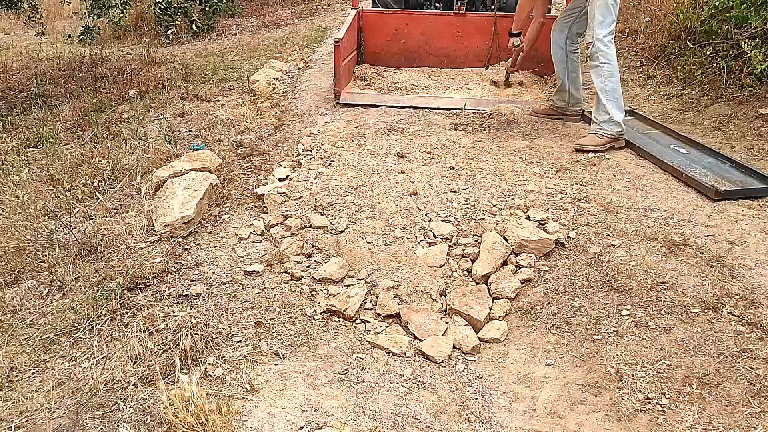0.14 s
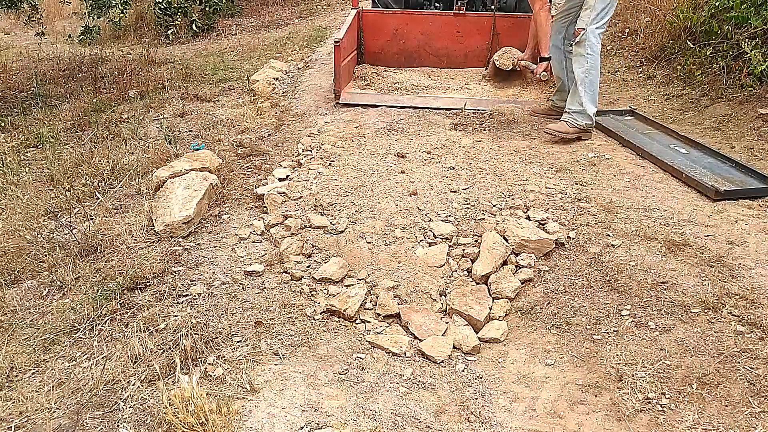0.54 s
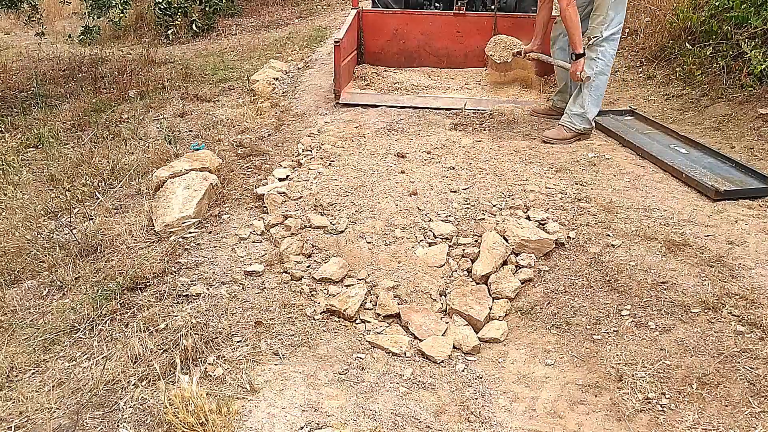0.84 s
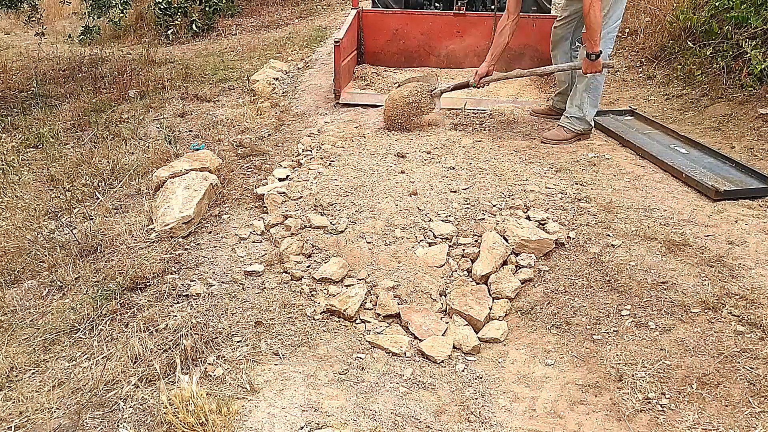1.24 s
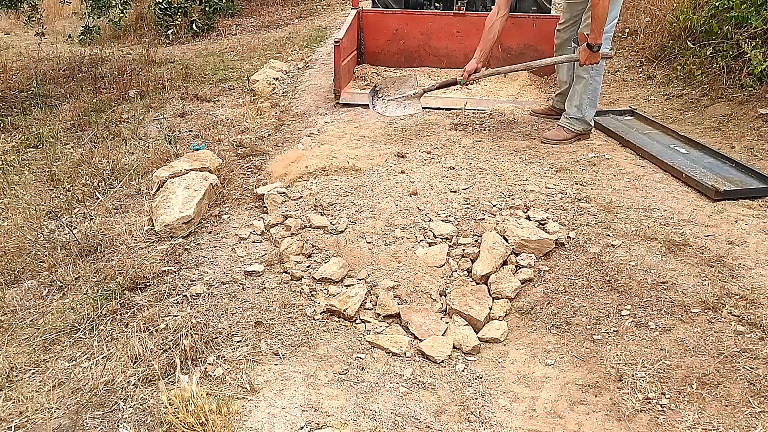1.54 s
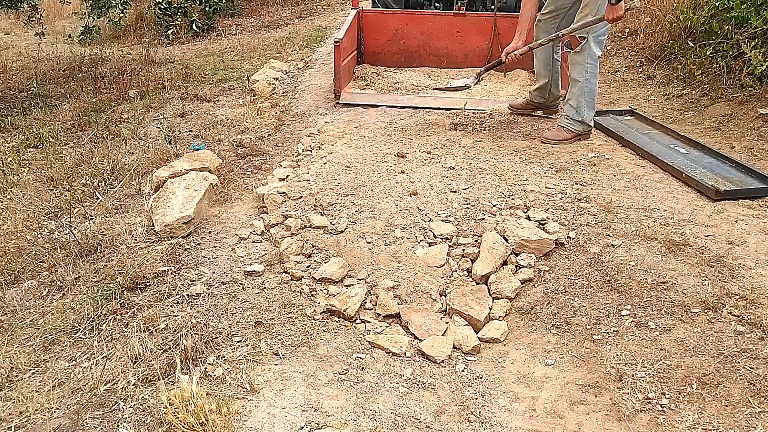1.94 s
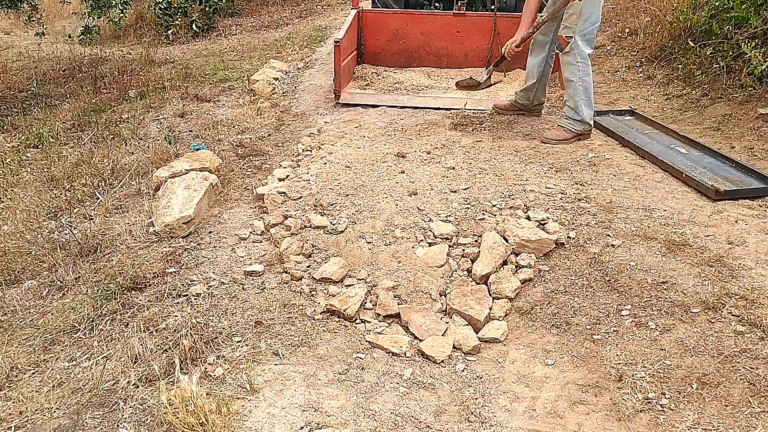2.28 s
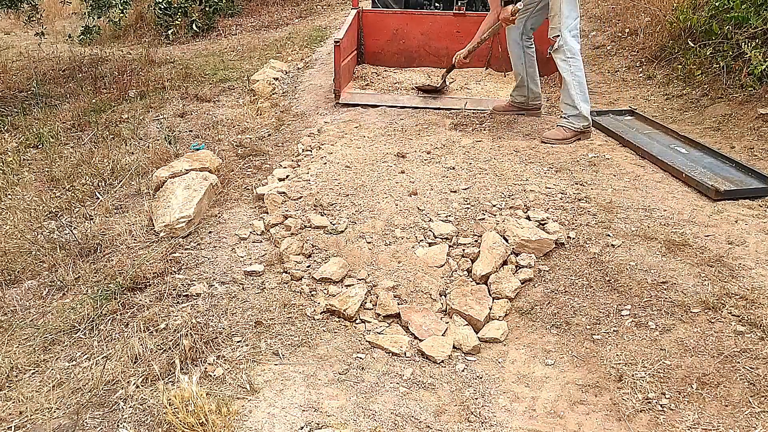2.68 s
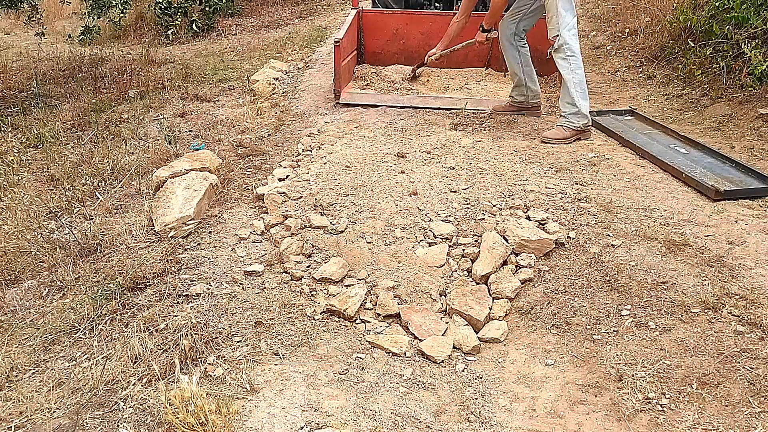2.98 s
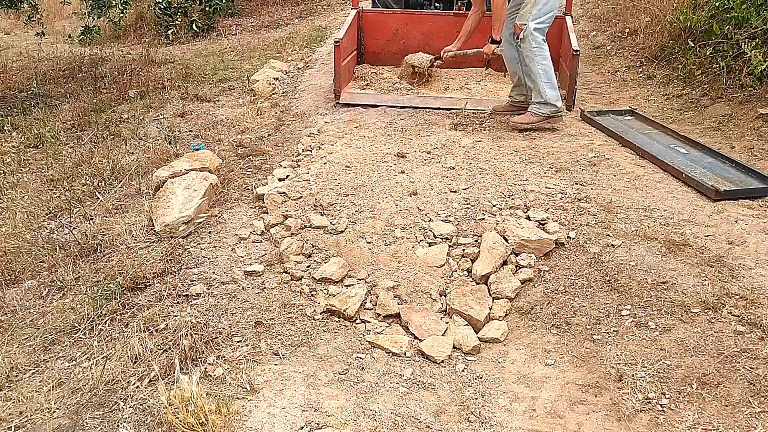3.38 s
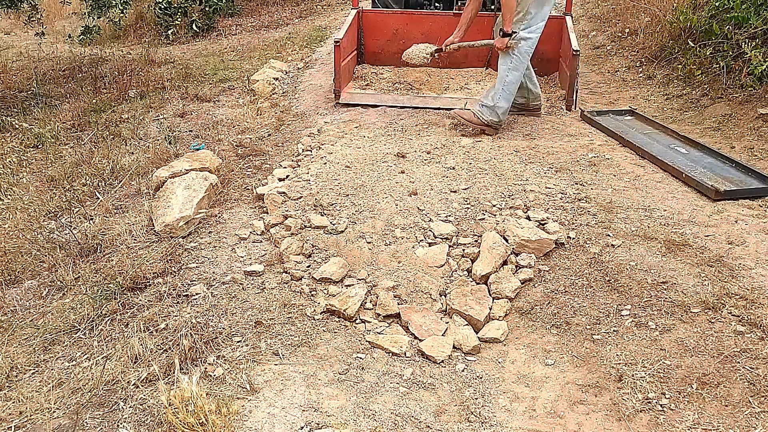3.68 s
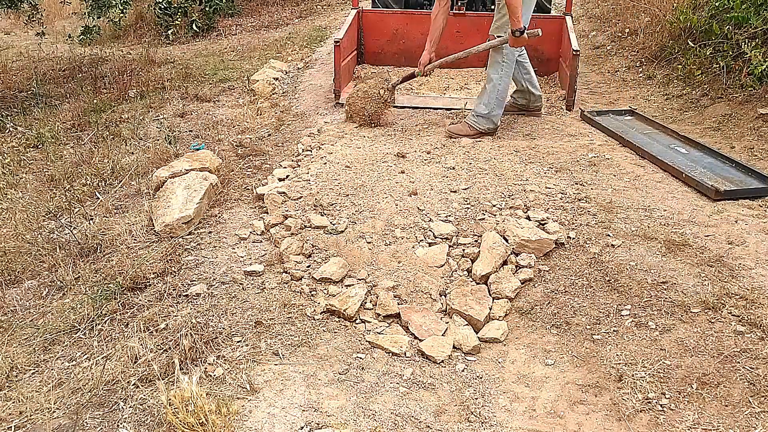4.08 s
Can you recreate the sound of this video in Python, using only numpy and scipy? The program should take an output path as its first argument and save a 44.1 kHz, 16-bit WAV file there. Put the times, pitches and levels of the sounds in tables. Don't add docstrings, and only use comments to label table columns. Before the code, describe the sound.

A shovel bites harshly into sand and gravel in a steel trailer box, tosses the load, then strikes the floor and scoops again outdoors.

```python
import sys
import numpy as np
from scipy import signal
from scipy.fft import rfft, irfft, next_fast_len
from scipy.io import wavfile

SR = 44100
rng = np.random.default_rng(int(sys.argv[2]) if len(sys.argv) > 2 else 0)


def amplitude_ratio(level_db):
    exponent = np.asarray(level_db, float) / 20
    return 10 ** exponent


def transcribe(signal):
    frames = np.atleast_2d(signal).T
    limited = np.clip(frames, -1, 1)
    pcm = np.round(limited * 32767).astype(np.int16)
    wavfile.write(sys.argv[1], SR, pcm)


N = 186084
SIZE = next_fast_len(N + 8192)
HZ = np.maximum(np.arange(SIZE // 2 + 1) * SR / SIZE, 1)

# (time [s], grit hiss [dB], blade scrape [dB], box rumble [dB])
SCOOP_1 = [
    [(0.0, -28.5, -26, -43), (0.024, -22.5, -32.5, -30), (0.034, -17.5, -18.5, -44),
     (0.05, -30, -32.5, -39.5)],
    [(0.052, -27.5, -28, -34), (0.062, -20.5, -22, -45.5), (0.112, -41, -39.5, -37.5),
     (0.125, -41.5, -53, -49.5)],
    [(0.127, -46, -48.5, -45.5), (0.141, -43.5, -34.5, -40), (0.189, -48, -56.5, -57),
     (0.211, -54, -42.5, -49.5), (0.223, -54, -62.5, -55.5), (0.3, -72, -72, -70.5)],
]
THROW = [(0.31, -81, -79, -82), (0.55, -69.5, -75, -66), (0.67, -68, -79.5, -76.5), (0.83, -63.5, -76, -72),
         (0.94, -65, -73, -72.5), (1.1, -61, -76.5, -72), (1.22, -52.5, -59, -67),
         (1.27, -51, -54.5, -60.5), (1.42, -53, -67.5, -69.5), (1.63, -53, -64.5, -68),
         (1.71, -55, -70, -69.5), (1.85, -59.5, -76.5, -72), (2.14, -78.5, -106, -73.5),
         (2.33, -100.5, -101, -70), (2.42, -96.5, -99.5, -82)]
SCOOP_2 = [
    [(2.433, -44, -37.5, -32), (2.473, -42, -45, -44), (2.499, -49.5, -45.5, -46),
     (2.524, -33, -40.5, -52.5)],
    [(2.527, -25, -33.5, -48), (2.571, -23, -23.5, -34.5), (2.605, -26, -34.5, -37),
     (2.613, -25, -26, -30.5), (2.69, -29, -30, -33)],
    [(2.692, -26, -25, -32), (2.72, -19, -27.5, -32), (2.758, -24.5, -32.5, -35.5), (2.846, -33, -37, -36),
     (2.886, -29, -38.5, -24.5), (2.91, -35.5, -41, -38)],
    [(2.912, -40.5, -45, -33), (2.942, -48, -56.5, -42.5), (2.972, -45.5, -60, -46.5),
     (2.984, -42.5, -43, -42), (3.026, -58, -67, -52.5), (3.12, -62.5, -70.5, -66.5)],
]
LIFT = [
    (3.13, -73, -83, -71),
    (3.412, -65, -69.5, -76),
    (3.606, -68.5, -76.5, -70.5),
    (3.686, -66.5, -74, -61.5),
    (3.82, -58, -68.5, -72),
    (3.97, -56.5, -73.5, -70.5),
]
SLIDE = [
    (3.98, -55, -67, -63),
    (4.02, -56.5, -61, -68.5),
    (4.158, -45, -52, -60.5),
    (4.214, -53.5, -59.5, -76.5),
    (4.22, -49.5, -58.5, -72),
]
# (time [s], peak [dB], blade share [dB], box share [dB], t60 [s])
CLODS = [(0.2035, -41.5, -5.5, -0.5, 0.07), (0.7515, -51, -24, -12.5, 0.11), (0.815, -48, -24, -25, 0.087),
         (0.8379, -48.5, -6, -13, 0.088), (0.9926, -45.5, -16, -11.5, 0.076), (1.05, -37, -18, -37, 0.062),
         (1.086, -41.5, -19, -26, 0.097), (1.0942, -45.5, -20, -14.5, 0.1), (1.1022, -36.5, -18, -13, 0.07),
         (1.1232, -23.5, -19, -29, 0.083), (1.1542, -36.5, -31, -15.5, 0.11), (1.7738, -42, -13, -26, 0.05),
         (1.8646, -45.5, -8, -35.5, 0.065), (2.2398, -61.5, -26, 2.5, 0.07), (2.3624, -69, -18, 9.5, 0.099),
         (2.4319, -31.5, -2, 4.5, 0.068), (2.5299, -20, -4, -13, 0.07), (2.6374, -17, -16.5, -14, 0.092),
         (3.2655, -50.5, -12, -23.5, 0.055), (3.3528, -46.5, -15.5, -7.5, 0.058),
         (3.599, -45, -9, -10, 0.14), (3.6242, -43.5, -7, -1, 0.083), (3.688, -24.5, -13.5, -20, 0.033),
         (3.6944, -36, -29.5, -16.5, 0.062), (3.7133, -31.5, -38, -51, 0.07),
         (3.7468, -36, -15.5, -31, 0.093), (3.7693, -32, -17, -21, 0.07),
         (3.7866, -34.5, -18.5, -16, 0.089), (3.8573, -26, -17, -26, 0.037),
         (3.9027, -38.5, -24.5, -24, 0.049), (3.9385, -35.5, -24, -18, 0.097)]
# (time [s], peak [dB], blade share [dB], box share [dB], t60 [s])
SURGES = [(0.0599, -6, -17, -17, 0.075), (0.1404, -27, -8, -12.5, 0.05), (0.7876, -46, -21, -25, 0.05),
          (1.3154, -37.5, -24, -23, 0.05), (1.5738, -36.5, -23, -15, 0.05),
          (2.5534, -18.5, -12, -17, 0.037), (2.5764, -16.5, -7, -7.5, 0.043),
          (2.6139, -12.5, -18, -11.5, 0.044), (2.7002, -11.5, -15.5, -20.5, 0.046),
          (2.7214, -12, -25, -19, 0.057), (2.8734, -19.5, -3.5, -5.5, 0.041),
          (2.8825, -8, -16.5, -16, 0.05)]
# (time [s], share [0-1])
EMPTYING = [
    (1.15, 0),
    (1.24, .9),
    (1.4, 0),
    (3.98, 0),
    (4.1, .9),
    (4.22, .9),
]
# (frequency [Hz], density [dB per Hz])
GRIT_SPECTRUM = [(3000, -42.5), (4800, -27), (5500, -15.5), (7000, -9), (8000, -1), (9000, 3), (10700, 1.5),
                 (11600, -9), (12200, -24), (16200, -35.5)]
# (frequency [Hz], density [dB per Hz])
TOP_BAND_SPECTRUM = [(11000, -30.5), (12200, 0), (15300, -2), (16200, -20.5)]
TOP_BAND_DB, TOP_BAND_GROWTH = -30.5, 0.71
# (frequency [Hz], width [Hz], level [dB])
BLADE_MODES = [(1750, 17, 1), (2510, 16, 3), (2920, 46, -4.5), (4180, 68, -10.5), (4900, 37, -12.5),
               (5140, 68, -11), (5120, 220, -15)]
# (frequency [Hz], width [Hz], level [dB])
BLADE_EDGE_MODE = (7880, 1500, -4.5)
# (frequency [Hz], width [Hz], level [dB])
FREE_BLADE_MODES = [(1750, 60, -3), (2160, 98, -5), (2450, 120, 2.5), (2830, 110, -3), (3560, 120, -6),
                    (5100, 150, -7)]
# (frequency [Hz], width [Hz], level [dB])
BOX_MODES = [(215, 120, 2), (449, 26, -2), (757.4, 49, -3.5), (969, 330, 7.5), (1490, 35, -7.5)]
# (frequency [Hz], density [dB per Hz])
AIR_SPECTRUM = [(59, -29.5), (100, 2), (471, -8), (784, -22.5), (1030, -26), (1480, -22.5), (1580, -26.5),
                (10500, -16.5), (16000, -28)]
AIR_DB = -73.5
# (time [s], level [dB], left minus right [dB])
WIND = [(0.0, -73, -2), (0.09, -55, 0.5), (0.23, -53, 13), (0.37, -59.5, 14), (0.45, -56, 38.5),
        (0.5, -53, 51.5), (0.6, -56, 19.0), (0.68, -50, 24.5), (0.82, -50.5, 1.5), (0.94, -58.5, 10),
        (1.08, -61, -1.5), (1.16, -66, 4), (1.61, -60.5, 15), (1.66, -73.5, 10.5), (2.07, -71, -2),
        (2.28, -75.5, 6.5), (2.67, -61.5, 2.5), (3.01, -70, 7), (3.1, -60, -7), (3.19, -72, 0.5),
        (3.38, -66, 5), (3.47, -66, -6), (3.55, -65.5, 8.5), (3.66, -61, 4), (3.78, -57.5, 14.5),
        (3.92, -66, -16.5), (3.97, -57.5, -2), (4.05, -58, 26.0), (4.22, -58, -5.5)]
# (time [s], peak [dB], ring [Hz], left minus right [dB], flutter share [dB])
SLAPS = [(0.12, -55.5, 26.9, 4, 11), (0.22, -40, 34.4, 21, -12), (0.418, -49, 26.4, 18.5, -13.5),
         (0.468, -37, 30.4, 40, -10.5), (0.509, -42, 100.5, 31.5, -14), (0.528, -43, 42.9, 34.5, -14),
         (0.569, -40, 27.4, 29, -12), (0.584, -44.5, 26.4, 23, -1.5), (0.657, -35.5, 73.4, 30, -7.5),
         (0.698, -49, 43.1, 21.5, -25.5), (0.76, -51, 71.5, 11, -10), (0.808, -63, 32.3, 3.5, -7.5),
         (0.849, -42, 27.6, 7.0, -28), (0.907, -43.5, 29.7, 15, -24), (1.018, -54, 39.4, 6.0, -16),
         (1.158, -49, 27.6, 16, -20), (1.437, -52, 47, 16.5, -15.5), (1.6, -54.5, 26.6, 9, -16),
         (1.999, -60, 26.9, -1.0, -21), (2.149, -62, 26.9, 4.5, -7.5), (2.279, -68, 26.95, 3, -4),
         (3.181, -58, 26.66, 5.5, -11), (3.298, -59.5, 26.1, 7, -13), (3.7, -54, 26.9, 11, -27),
         (3.788, -48.5, 53.4, 21.5, -21), (3.869, -51.5, 32.6, -12.0, -24), (3.968, -55, 26.7, -5.0, -32),
         (4.062, -35, 66.4, 28.5, -12.5)]
FLUTTER_HZ, FLUTTER_T60_S = 166, 0.078
# (time [s], peak [dB], pitch [Hz], ring share [dB], t60 [s])
STONES = [(0.018, -17.5, 1240, -3, 0.04), (0.035, -15, 1940, -8.5, 0.023), (0.053, -19, 1254, -2.5, 0.063),
          (0.061, -11.5, 1420, -8.5, 0.066), (0.064, -20, 2110, -2.5, 0.04), (0.09, -18, 1940, -5.5, 0.059),
          (0.096, -14, 1086, -10.5, 0.045), (0.138, -22, 1470, -8, 0.044), (0.141, -18, 2240, 0, 0.022),
          (0.155, -23, 2070, -11, 0.04), (0.159, -27, 1040, -9, 0.047), (0.18, -30, 1980, -21, 0.036),
          (0.192, -37, 1130, -10, 0.03), (0.206, -22.5, 2004, -3, 0.023), (0.212, -37, 999, -19.5, 0.055),
          (1.126, -54, 870, 5.5, 0.079), (1.249, -42, 1750, -8, 0.072), (2.434, -21, 927, -3, 0.052),
          (2.454, -31, 802, -1, 0.083), (2.542, -35, 969, 3, 0.12), (2.574, -19.5, 969, -1, 0.051),
          (2.614, -18.5, 1002, 2, 0.059), (2.639, -23, 1420, -12.5, 0.051), (2.649, -18, 1415, -11.5, 0.11),
          (2.679, -20.5, 830, -8.5, 0.058), (2.697, -15, 1975, -8.5, 0.11), (2.719, -15.5, 738, -2, 0.058),
          (2.734, -27, 791, 2.5, 0.11), (2.764, -24, 757.4, 2.5, 0.049), (2.86, -19, 1928, -3, 0.074),
          (2.867, -18.5, 1720, -12, 0.032), (2.874, -11, 1074, -3.5, 0.026), (2.884, -9, 1300, -14, 0.069),
          (2.892, -26.5, 851, -2, 0.09), (2.982, -37.5, 692, -26, 0.028), (3.619, -38.5, 920, -2, 0.032),
          (3.69, -46, 910, -9.5, 0.053)]
# (time [s], length [s], level [dB], top [Hz])
SCUFFS = [
    (0.492, .11, -58, 1500),
    (1.33, 0.075, -61, 999),
    (2.039, 0.079, -60.5, 1496),
    (2.234, 0.072, -66.5, 899),
    (2.309, 0.027, -70.5, 800),
    (2.367, .05, -68.5, 695),
    (3.362, 0.065, -65, 1210),
    (3.422, 0.055, -68, 1204),
]
# (frequency [Hz], level [dB], t60 [s])
FLOOR_PLATE_MODES = [(164, -10.5, 0.23), (258, -9.5, 0.082), (360, -19.5, 0.087), (523, -3, 0.056),
                     (630, -14.5, 0.078), (803, -1, 0.07), (992, 0.5, 0.042), (1130, -6.5, 0.046),
                     (1300, -22.5, 0.064), (2420, -20.5, 0.45)]
LANDING_S, LANDING_DB = 2.432, -21
# (frequency [Hz], left minus right [dB])
PORT_DB = [(200, 6.5), (700, 5.5), (1500, 2.5), (4800, -.5), (7500, -2.5), (9000, -7), (10000, 3.5),
           (11000, 3.5), (12500, 1.5)]
# (frequency [Hz], left lead [rad])
PORT_PHASE_RAD = [(4000, 0.29), (6000, 1.4), (8000, 1.4), (10000, 1.4), (12500, 3.1)]
# (frequency [Hz], likeness [0-1])
LIKENESS = [(300, 0.81), (1700, 0.76), (4000, 0.53), (7000, 1), (10000, 0.22), (14000, 0.41)]
FIRST_LEAD_S, FIRST_UNTIL_S, FIRST_SPREAD = 6e-5, 0.28, 0.7


def at_hz(points):
    hz, values = np.transpose(points)
    return np.interp(np.log(HZ), np.log(hz), values)


def in_time(rows):
    s, *columns = np.transpose(rows)
    return [np.interp(np.arange(N) / SR, s, column) for column in columns]


def through(x, response):
    return irfft(rfft(x, SIZE) * response, SIZE)[..., :N]


def unit_in(response, band):
    inside = (HZ > band[0]) * (HZ < band[1])
    return response / np.sqrt(np.mean(np.abs(response) ** 2 * inside))


def high_pass(hz):
    return 1 / (1 + hz / (1j * HZ)) ** 2


def resonances(modes, between_db, low_hz, high_hz):
    rings = sum(amplitude_ratio(db) * 1j * HZ * w / (hz ** 2 - HZ ** 2 + 1j * HZ * w) for hz, w, db in modes)
    return (rings + amplitude_ratio(between_db)) * high_pass(low_hz) / (1 + 1j * HZ / high_hz) ** 2


def drift(rate_hz, count):
    low_pass = signal.butter(2, rate_hz, fs=SR, output="sos")
    slow = signal.sosfilt(low_pass, rng.standard_normal((count, N + SR)))[:, SR:]
    return slow / slow.std()


def ring(s, db, hz, t60_s, rise_s):
    out, i = np.zeros(N), round(s * SR)
    t = np.arange(min(N - i, round(2 * t60_s * SR))) / SR
    envelope = amplitude_ratio(db - 60 * t / t60_s) * (1 - np.exp(-t / rise_s))
    out[i:i + len(t)] = envelope * np.sin(2 * np.pi * hz * t)
    return out


def grains(per_s, spread_db, clump_db):
    sizes = amplitude_ratio(spread_db * np.minimum(rng.exponential(1, (2, N)), 5))
    signs = rng.choice([-1, 1], (2, N))
    hits = rng.random((2, N)) < per_s / SR
    stream = sizes * signs * hits * amplitude_ratio(clump_db * drift(120, count=1))
    return stream / stream.std()


def gravel(per_s, spread_db, cycles):
    hits = amplitude_ratio(spread_db * np.minimum(rng.exponential(1, N), 4)) * (rng.random(N) < per_s / SR)
    dealt, out = rng.integers(0, 30, N), []
    for k, hz in enumerate(np.geomspace(230, 5500, 30) * rng.uniform(0.95, 1.04, 30)):
        radius = amplitude_ratio(-60 * hz / (cycles * (hz / 1000) ** 0.4 * SR))
        w = 2 * np.pi * hz / SR
        poles = [1, -2 * radius * np.cos(w), radius ** 2]
        out.append(signal.lfilter([np.sin(w)], poles, hits * (dealt == k) + 1e-18))
    low, high = sum(out[:16]), sum(out[16:])
    return low / low.std(), high / high.std()


def burst_power(events, rise_s):
    power, t = np.zeros((3, N)), np.arange(SR // 2) / SR
    for s, db, blade_db, box_db, t60_s in events:
        i = round(s * SR)
        decay = amplitude_ratio(db - 5.5 - 60 * t / max(t60_s, 0.005))
        burst = (decay * (1 - np.exp(-t / rise_s)))[:N - i] ** 2
        power[:, i:i + len(burst)] += burst * amplitude_ratio([[0], [blade_db], [box_db]]) ** 2
    return power


def clod_clicks():
    clicks = np.zeros(N)
    for s, db, *_ in CLODS:
        clicks[round(s * SR)] = amplitude_ratio(db + 3.0)
    return clicks


def sand():
    steady_db = np.array(in_time(np.vstack([*SCOOP_1, THROW, *SCOOP_2, LIFT, SLIDE])))
    steady = amplitude_ratio(steady_db + 1.0 * drift(29, count=3))
    bursts = burst_power(CLODS, rise_s=0.0002) + burst_power(SURGES, rise_s=0.0027)
    hiss, blade, box = np.sqrt(steady ** 2 + bursts)
    emptying = in_time(EMPTYING)[0]
    fine = grains(per_s=22000, spread_db=2.5, clump_db=1.5)
    coarse = grains(per_s=7000, spread_db=4.0, clump_db=1.6)
    low, high = gravel(per_s=2200, spread_db=1.0, cycles=82)

    grit_filter = unit_in(amplitude_ratio(at_hz(GRIT_SPECTRUM)), band=(6000, 12000))
    top_band_filter = unit_in(amplitude_ratio(at_hz(TOP_BAND_SPECTRUM)), band=(12000, 16000))
    free_filter = unit_in(resonances(FREE_BLADE_MODES, -30, 1200, 7400), band=(1500, 5000))
    loaded_modes = [*BLADE_MODES, BLADE_EDGE_MODE]
    blade_filter = unit_in(resonances(loaded_modes, -4, 1100, 10000), band=(1500, 5000))
    box_filter = unit_in(resonances(BOX_MODES, 3, 84, 2000), band=(350, 1400))

    out = through(hiss * fine + clod_clicks(), grit_filter)
    out += through(amplitude_ratio(TOP_BAND_DB) * hiss ** TOP_BAND_GROWTH * fine, top_band_filter)
    out += through(emptying * blade * fine, free_filter)
    out += through(blade * (0.45 * fine + 0.39 * coarse), blade_filter)
    out += through(0.68 * box * coarse, box_filter)
    return out + 0.42 * box * low + 0.45 * blade * high


def still_air():
    response = unit_in(amplitude_ratio(at_hz(AIR_SPECTRUM)), band=(150, 16000))
    return amplitude_ratio(AIR_DB) * through(rng.standard_normal((2, N)), response)


def wind():
    level_db, pan_db = in_time(WIND)
    response = unit_in(1 / (1 + 18 / (1j * HZ)) / (1 + 1j * HZ / 60) ** 2.52, band=(25, 110))
    rumble = through(rng.standard_normal((2, N)), response)
    out = rumble * amplitude_ratio(level_db - 1.0 + np.outer([0.3, -0.7], pan_db) + 0.74 * drift(14, count=2))
    for s, db, hz, slap_pan_db, flutter_db in SLAPS:
        side_db = np.minimum([[slap_pan_db], [-slap_pan_db]], 0)
        slap = ring(s, db + 12.5, hz, 4.37 / hz, rise_s=0.26 / hz)
        flutter = ring(s, db + flutter_db + 15.5, FLUTTER_HZ, FLUTTER_T60_S, rise_s=0.0022)
        out += amplitude_ratio(side_db) * (slap + flutter)
    return out


def stones():
    out = np.zeros(N)
    for s, db, hz, ring_db, t60_s in STONES:
        out += ring(s, db + 2.0, 1.24 * hz, 5.5 / hz, rise_s=0.00005)
        out += ring(s, db + ring_db, hz, max(t60_s, 0.004), rise_s=0.003)
    return through(out, high_pass(110))


def scuffs():
    t, out = np.arange(N) / SR, 0
    soil = grains(per_s=2100, spread_db=4.0, clump_db=1.5)
    for s, length_s, db, top_hz in SCUFFS:
        drag = np.interp(t, [s, s + 0.75 * length_s, s + length_s], [0, 1, 0])
        response = unit_in(high_pass(220) / (1 + 1j * HZ / top_hz) ** 4.5, band=(300, 3000))
        out = out + through(amplitude_ratio(db) * drag * soil, response)
    return out


def blade_landing():
    plate = sum(ring(LANDING_S, LANDING_DB + db, hz, t60_s, rise_s=1.7 / hz)
                for hz, db, t60_s in FLOOR_PLATE_MODES)
    return through(plate, high_pass(110))


def ports(direct, scattered):
    colour = amplitude_ratio(at_hz(PORT_DB) / 2)
    right_port = np.exp(-1j * at_hz(PORT_PHASE_RAD)) / colour
    early = np.arange(N) < FIRST_UNTIL_S * SR
    right = 0
    for gate, lead_s, spread in ((early, FIRST_LEAD_S, FIRST_SPREAD), (~early, 0, 1)):
        alike = np.clip(at_hz(LIKENESS) * np.interp(HZ, [1500, 4000], [1, spread]), 0, 1)
        path = right_port * np.exp(-2j * np.pi * HZ * lead_s)
        right = right + through(direct * gate, alike * path)
        right = right + through(scattered * gate, np.sqrt(1 - alike ** 2) * path)
    return np.array([through(direct, colour), right])


def scene():
    knocks = stones() + blade_landing()
    direct, scattered = sand() + still_air() + scuffs() + knocks * [[1], [0.6]]
    return ports(direct, scattered) + wind()


def top_cut(x):
    return signal.sosfilt(signal.butter(12, 15950, fs=SR, output="sos"), x)


def record(dry):
    ceiling = 0.94
    mix = ceiling * np.tanh(dry / ceiling)
    return top_cut(mix)


dry = scene()
out = record(dry)
transcribe(out)
```